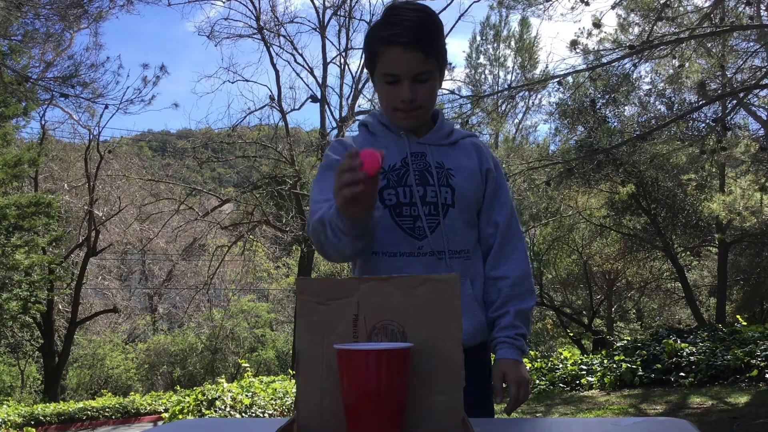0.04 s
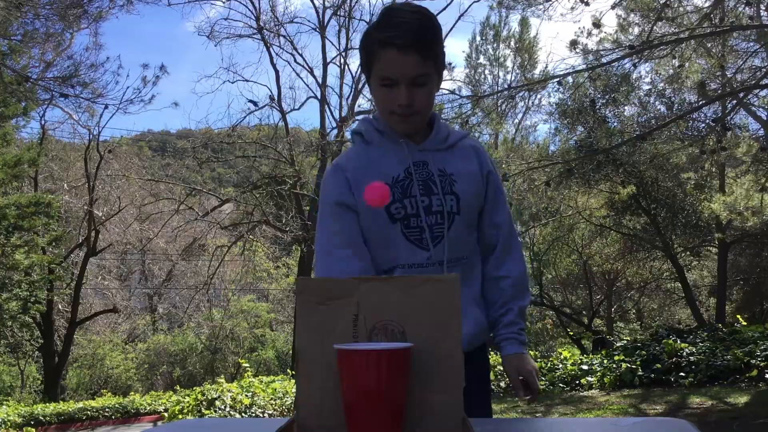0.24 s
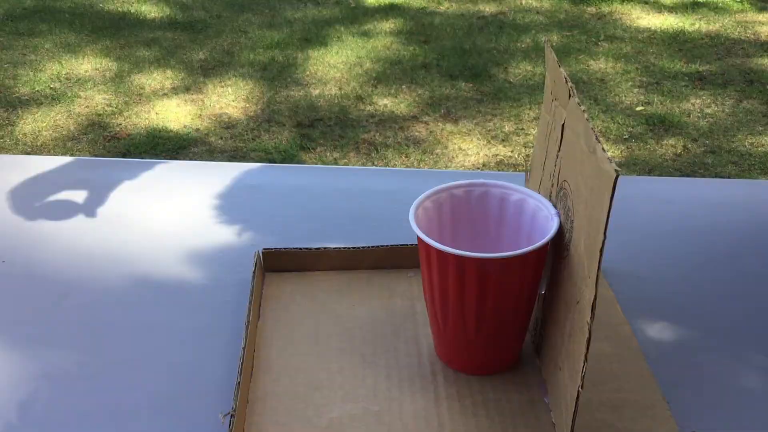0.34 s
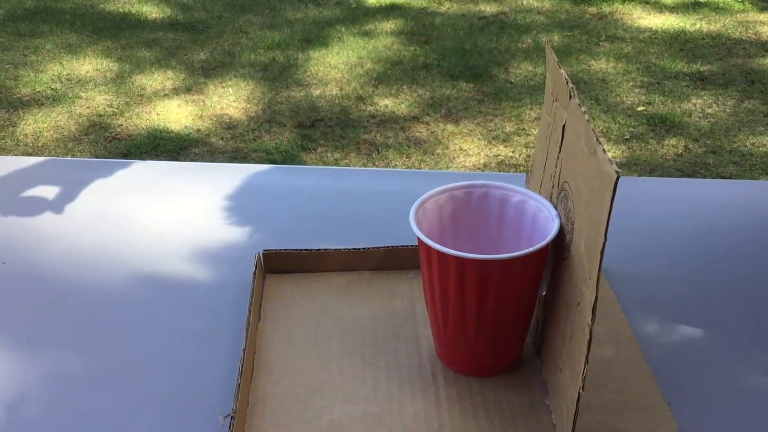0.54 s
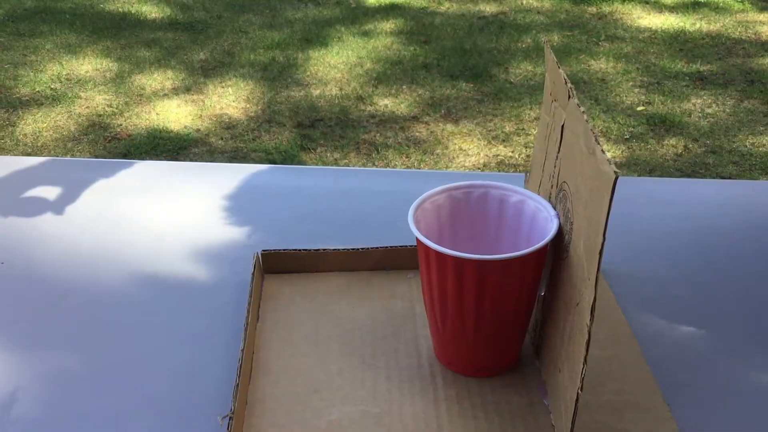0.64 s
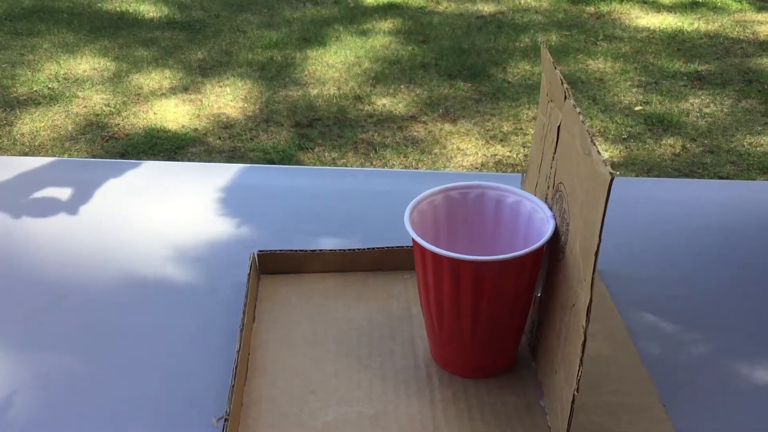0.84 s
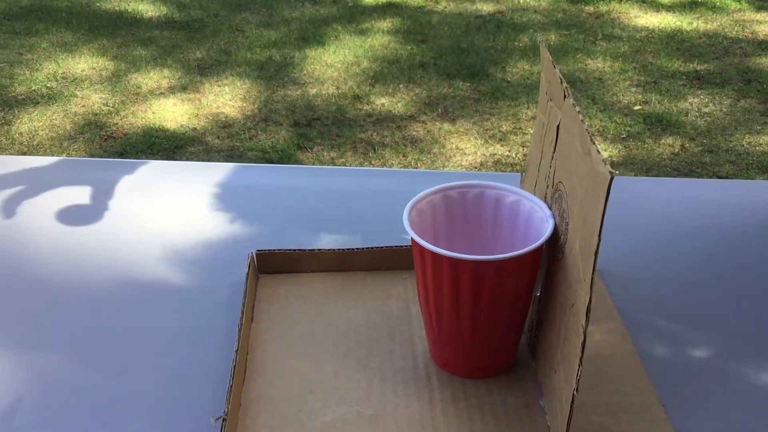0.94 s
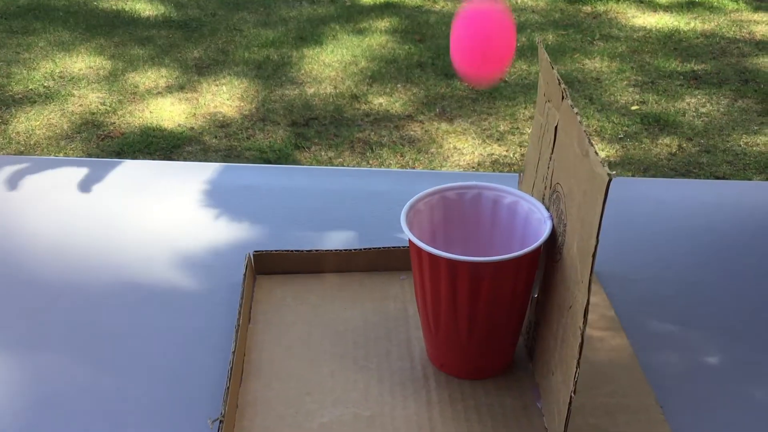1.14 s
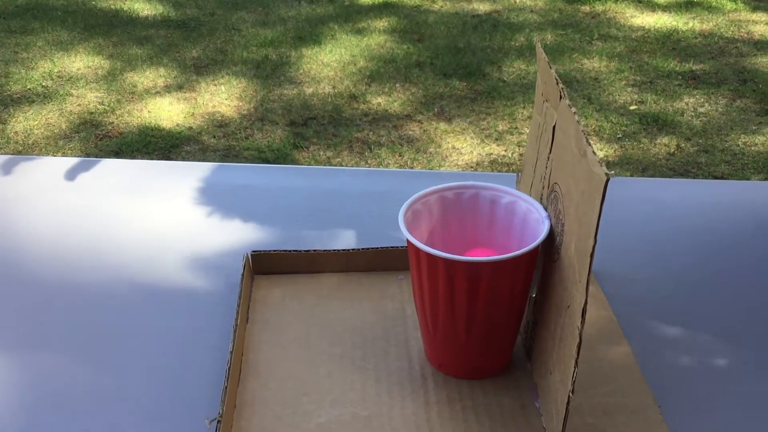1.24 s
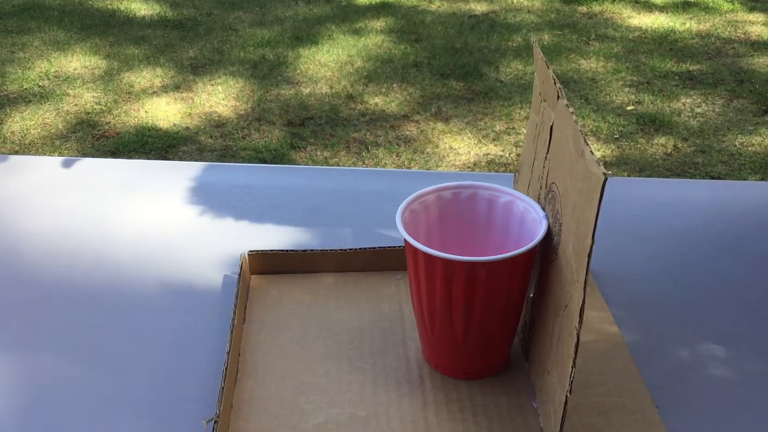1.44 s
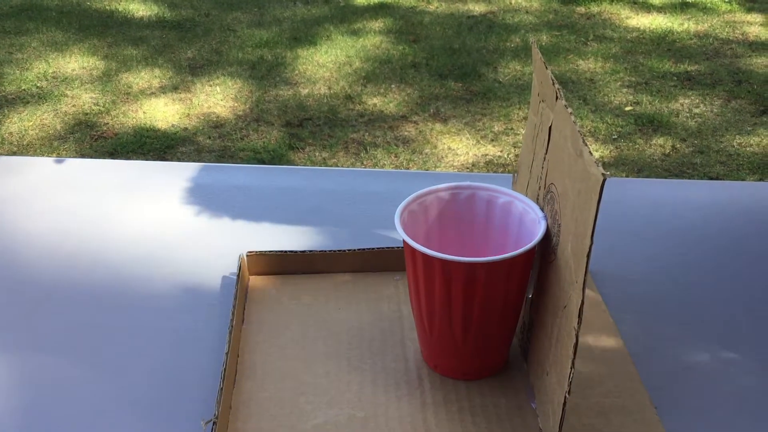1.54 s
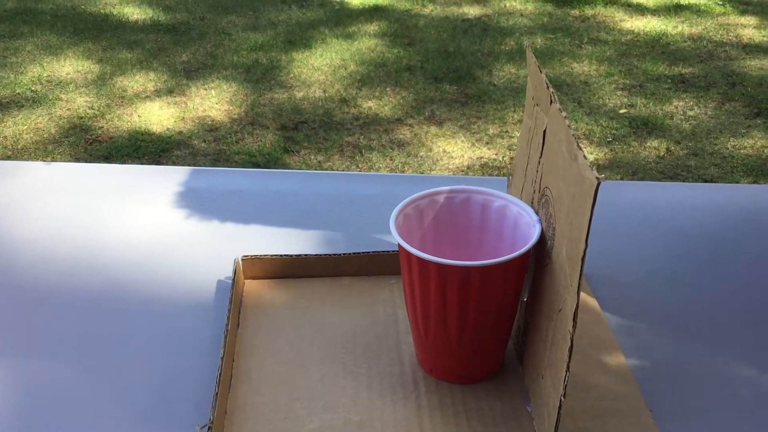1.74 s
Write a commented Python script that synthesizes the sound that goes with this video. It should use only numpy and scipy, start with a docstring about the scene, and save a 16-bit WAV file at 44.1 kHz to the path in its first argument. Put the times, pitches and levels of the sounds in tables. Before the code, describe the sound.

A light plastic ball bangs on a hollow plastic table at about 0.2 seconds, its boom cut short by 0.4, with a faint cardboard tap before and after. Soft, dull bumps come around 1 second. At 1.3 seconds the ball drops into a plastic cup with a hollow knock, then bounces faster and softer until 1.8. A quiet garden rumble and faint hiss lie underneath.

```python
"""A light plastic ball, thrown outdoors, bangs once on a hollow plastic table, whose boom is cut short.
After a few soft bumps it drops into a plastic cup and bounces ever faster on the bottom, making the
air in the cup and its thin wall ring. Two dry taps on cardboard and some light plastic ticks join in.
Behind it all lies a quiet garden with a low rumble, a faint hiss, soft tones and a slight echo."""
import sys
import numpy as np
from scipy import signal
from scipy.fft import irfft
from scipy.io import wavfile

SR = 44100
rng = np.random.default_rng(int(sys.argv[2]) if len(sys.argv) > 2 else 0)


def wav_record(signal):
    """Record a signal, one row per channel, as 16-bit PCM in the file named by sys.argv[1]."""
    frames = np.transpose(np.atleast_2d(signal))
    bounded = np.clip(frames, -1, 1)
    # unit amplitude maps onto the largest positive 16-bit level
    quanta = np.round(bounded * 32767).astype(np.int16)
    wavfile.write(sys.argv[1], SR, quanta)


N = 79380
T = np.arange(N) / SR
FREQS = np.maximum(np.fft.rfftfreq(N, 1 / SR), 1)
BANG_S, BOOM_ENDS_S = .2375, .3977

# The ball's bounces in the cup. Each row: start in seconds, levels of air, wall and click in dB,
# the air's fade time in seconds, level of the base in dB, the wall's brightness in dB per octave.
CUP_BOUNCES = [(1.2781, 0.5, -18.5, -23, 0.036, -29, 4), (1.5266, -10, -42, -33, 0.045, -45, -12),
               (1.6616, -11, -31.5, -35, 0.025, -29.5, -3.7), (1.7232, -20.5, -46, -48, 0.036, -39, -7),
               (1.756, -24.5, -56, -57, 0.036, -45.5, -5), (1.7745, -31.5, -62, -73, 0.053, -51, -17.5)]


def undb(db):
    """Turns decibels (dB) into a number to multiply a sound by."""
    return 10 ** (np.asarray(db) / 20)


def since(start):
    """Seconds since a moment, zero before it."""
    return np.maximum(T - start, 0)


def swell(age, rise, fade):
    """Builds up smoothly, then dies away. The fade time is how long it takes to drop by 60 dB."""
    return (1 - np.exp(-(age / rise) ** 2)) * np.exp(-np.log(1000) * age / fade)


def ring(start, hz, db, fade, rise):
    """One tone of something that has been struck."""
    age = since(start)
    return undb(db) * swell(age, rise, fade) * np.sin(2 * np.pi * hz * age)


def noise(gain):
    """Noise with an overall level of one; gain sets how its frequencies are balanced."""
    wave = irfft(gain * np.exp(2j * np.pi * rng.random(len(FREQS))), N)
    return wave / wave.std()


def shaped_noise(points):
    """Noise shaped by a table. Each row: frequency in Hz, relative level in dB."""
    hz, db = np.array(points).T
    return noise(undb(np.interp(np.log(FREQS), np.log(hz), db)))


def ringing_noise(bands, hits, tail_db=-200, tail_fade=1):
    """Tones too crowded to tell apart: each hit sets bands of noise ringing, with a weak tail."""
    centres = np.log([band[0] for band in bands])
    low_cut = np.minimum(FREQS / bands[0][0], 1) ** 2
    out = np.zeros(N)
    for this_band, (_, db, fade, rise) in zip(np.eye(len(bands)), bands):
        share = np.interp(np.log(FREQS), centres, this_band) * low_cut
        loudness = np.zeros(N)
        for start, hit_db in hits:
            age = since(start)
            tail = undb(tail_db) * swell(age, rise, tail_fade)
            loudness += undb(hit_db) * (swell(age, rise, fade) + tail)
        out += undb(db) * loudness * noise(share)
    return out


def garden():
    """Low outdoor rumble and faint hiss, gently wavering; it turns deeper where the boom ends."""
    # The air before and after the boom ends. Each row: frequency in Hz, relative level in dB.
    light_air = [(15, -28.5), (60, 6.5), (130, 3.5), (300, -6), (500, -7), (750, -2.5), (1000, -18),
                 (1300, -15), (1800, -25), (4000, -35.5), (16000, -52.5)]
    deep_air = [(15, -34.5), (35, -7.5), (62, 2.5), (100, -2.5), (200, -8.5), (350, -15), (450, -24),
                (600, -23.5), (740, -22), (900, -31.5), (1500, -35.5), (2200, -39), (3200, -43.5),
                (4500, -54), (8000, -61.5), (16000, -71.5)]
    # How loud the deep air is. Each row: time in seconds, level in dB.
    deep_levels = [(.4, -50.5), (.62, -52), (.85, -53), (1.2, -51.5), (1.5, -50.5), (1.8, -51)]
    waver_db = .7 * noise(np.exp(-FREQS / 10))
    times, levels = np.array(deep_levels).T
    deep = shaped_noise(deep_air) * undb(np.interp(T, times, levels))
    light = shaped_noise(light_air) * undb(-58)
    return undb(waver_db) * np.where(T < BOOM_ENDS_S, light, deep)


def cardboard_taps():
    """Two dry taps make cardboard ring for a moment."""
    # The taps. Each row: start in seconds, level in dB.
    taps = [(0.0267, -41), (0.36, -42)]
    # Their ring. Each row: frequency in Hz, level in dB, fade and rise times in seconds.
    tap_bands = [(450, -10, 0.083, .001), (1210, -4, 0.0071, 0.00025), (2110, -20.5, 0.014, 0.00078),
                 (3360, -27, 0.0058, 0.00035), (7000, -55, .008, .0004)]
    return ringing_noise(tap_bands, taps)


def soft_bumps():
    """Dull bumps come through the table; their low notes arrive last and stir its boom."""
    # The bumps. Each row: start in seconds, level in dB, starting pitch in Hz, seconds to the peak.
    bumps = [(0.032, -32, 435, 0.0025), (0.168, -49, 201, 0.0044), (.838, -43, 598, 0.0031),
             (0.942, -42, 272, 0.0023), (1.003, -28, 295.5, 0.0035), (1.0265, -30, 305, 0.0034),
             (1.0509, -26.5, 212, 0.004)]
    # Their opening knock. Each row: frequency in Hz, level in dB, fade and rise times in seconds.
    knock_bands = [(204, -35.5, 0.062, 0.00093), (446, -19, 0.023, 0.0021), (800, -40, .012, .001),
                   (2000, -76, 0.0083, .001)]
    sag_s = .0086  # the pitch halves in this time
    out = ringing_noise(knock_bands, [bump[:2] for bump in bumps])
    for start, db, hz, peak_s in bumps:
        age = since(start)
        cycles = hz * sag_s * np.log1p(age / sag_s)
        pulse = (age / peak_s * np.exp(1 - age / peak_s)) ** 2
        out += undb(db) * pulse * np.sin(2 * np.pi * cycles)
        out += ring(start, hz=69, db=db - 13, fade=.2, rise=2 * peak_s)  # the boom
    return out


def faint_tones():
    """Soft, unsteady tones swell and fade just above the garden's hiss."""
    # The tones. Each row: time of the peak in seconds, swell time in seconds, pitch in Hz, level in dB.
    tones = [(.167, .014, 2145, -77.5), (.45, 0.084, 2180, -72.5), (.56, 0.033, 2175, -75.5),
             (.65, 0.023, 3440, -84), (1.131, 0.019, 686, -55), (1.122, .035, 348.3, -57.5),
             (1.597, 0.011, 1970, -67), (1.6, 0.072, 3250, -83)]
    wander = 1 + .04 * noise(np.exp(-FREQS / 60))  # the pitch strays by about 4 percent
    out = np.zeros(N)
    for peak_s, swell_s, hz, db in tones:
        loudness = undb(db) * np.exp(-((T - peak_s) / swell_s) ** 2)
        out += loudness * np.sin(2 * np.pi * hz * np.cumsum(wander) / SR)
    return out


def table_bang():
    """The ball hits the table top; low tones build up last and boom until cut off, leaving a hum."""
    # The top's tones, then the low hum. Each row: pitch in Hz, level in dB, fade time in seconds.
    top_tones = [(74.3, -14.5, 0.74), (84.3, -9, 0.37), (142.9, -8.5, 0.15), (224.8, -5.5, 0.15),
                 (226.8, -12, 0.27), (253.3, -13.5, .235), (288.3, -16, .19), (341, -13.5, 0.082),
                 (436, -29, 0.23), (494.6, -12, 0.049), (608, -24.5, .14), (755, -11.5, .115),
                 (835, -20, .1), (866, -10.5, .06), (995, -23.5, .08), (1165, -25.5, .07),
                 (1220, -24.5, .058), (1325, -23, 0.071), (1535, -25.5, 0.071), (1798, -34, 0.034),
                 (2110, -34, .035), (2360, -27.5, 0.019)]
    hum_tones = [(78.1, -45.5, 1.9), (156, -53.5, 2.2)]
    # The crowded tones of table and cardboard.
    # Each row: frequency in Hz, level in dB, fade and rise times in seconds.
    crash_bands = [(45, -45.5, 0.24, 0.0089), (112, -28, 0.62, .01), (198, -28.5, 0.49, 0.0067),
                   (422.3, -21.5, .2, 0.0057), (780, -33, 0.22, .004), (1480, -27, .075, .003),
                   (2398, -30.5, 0.054, 0.0025), (3100, -40.5, .055, .002), (3900, -33, 0.05, 0.0049),
                   (5200, -51, .055, .002), (9000, -61, 0.045, .001), (15000, -76, .03, .001)]
    rise_s, rise_cycles = .00039, 2.05
    # Every second tone starts by swinging the other way.
    boom = sum((-1) ** k * ring(BANG_S, hz, db, fade, rise_s + rise_cycles / hz)
               for k, (hz, db, fade) in enumerate(top_tones))
    crash = ringing_noise(crash_bands, [(BANG_S, 0)], tail_db=-40, tail_fade=.3)
    hum = sum(ring(BOOM_ENDS_S, hz, db, fade, rise_s) for hz, db, fade in hum_tones)
    return (boom + crash) * (T < BOOM_ENDS_S) + hum


def cup_bounces():
    """Each bounce clicks, rings the cup's base and wall, and pumps its air into a hollow pock."""
    # The ball's click on the cup, then that click thrown back by cardboard and table.
    # Each row: frequency in Hz, level in dB, fade and rise times in seconds.
    click_bands = [(200, -17, 0.089, 0.0013), (352, -13.5, 0.12, 0.0024), (1000, -13, 0.017, 0.0011),
                   (2200, -11.5, .014, 0.00055), (3500, -5, 0.0075, 0.00077), (5200, -22.5, 0.016, .0006),
                   (8300, -31, 0.013, 0.00036), (10300, -42, .011, 0.00068), (15000, -54, 0.013, .0006)]
    reflected_bands = [(332, -10.5, 0.089, 0.0023), (980, -30.5, 0.27, .004), (2500, -15, 0.06, .004),
                       (4660, -28, .06, .004), (6500, -34, 0.038, .004), (10000, -60, .04, .004)]
    # The wall's tones. Each row: pitch in Hz, relative level in dB, fade time in seconds.
    wall_tones = [(790, -3, 0.0039), (1177, -8, 0.025), (1544, -5, 0.043), (2022, -1.5, 0.021),
                  (2207, -1, 0.019), (2750, -12, 0.016), (2960, -11, .02), (3484, -8, 0.0083),
                  (3780, -24, 0.031)]
    plastic_rise_s = .00049
    clicks = [(start, click_db) for start, _, _, click_db, *_ in CUP_BOUNCES]
    out = ringing_noise(click_bands, clicks) + ringing_noise(reflected_bands, clicks)
    for start, air_db, wall_db, _, air_fade, base_db, brightness in CUP_BOUNCES:
        air_hz = 702.4 - .5 * air_db  # a softer bounce rings slightly higher
        out += ring(start, air_hz, air_db, air_fade, rise=.003)
        out += ring(start, hz=1072, db=base_db, fade=.049, rise=plastic_rise_s)
        for k, (hz, db, fade) in enumerate(wall_tones):
            pitch = hz * (1 + .012 * rng.standard_normal())  # the wall flexes differently each time
            level_db = wall_db + db + brightness * np.log2(hz / 2000)
            out += (-1) ** k * ring(start, pitch, level_db, fade, plastic_rise_s)
    return out


def garden_echo():
    """The garden faintly throws back each pock of the cup."""
    # The echo. Each row: frequency in Hz, level in dB, fade and rise times in seconds.
    echo_bands = [(300, -77, .25, 0.0054), (490, -62.5, .25, 0.012), (730, -45.5, 0.4, 0.01),
                  (1100, -54.5, 0.21, 0.0086), (2370, -69.5, .4, .012), (4000, -87, .3, .012)]
    return ringing_noise(echo_bands, [bounce[:2] for bounce in CUP_BOUNCES])


def plastic_ticks():
    """Plastic ticks lightly between the first two bounces in the cup."""
    # The ticks. Each row: start in seconds, level in dB.
    ticks = [(1.4, -61), (1.459, -77), (1.494, -63.5), (1.508, -72)]
    # Their ring. Each row: frequency in Hz, level in dB, fade and rise times in seconds.
    tick_bands = [(1500, 0, 0.037, .001), (3200, -3, 0.033, 0.0018), (5380, -8, 0.014, 0.0011),
                  (7000, -10, 0.0071, 0.0016), (9500, -15, .01, 0.0013)]
    return ringing_noise(tick_bands, ticks)


def scene():
    """Adds all the sounds together on one channel."""
    mix = (garden() + cardboard_taps() + soft_bumps() + faint_tones() + table_bang()
           + cup_bounces() + garden_echo() + plastic_ticks())
    return mix[None]


def record(dry):
    """Cuts away the highest treble."""
    top_hz = 15700
    return signal.sosfilt(signal.ellip(8, .2, 70, top_hz, fs=SR, output="sos"), dry)


dry = scene()
out = record(dry)
wav_record(out)
```